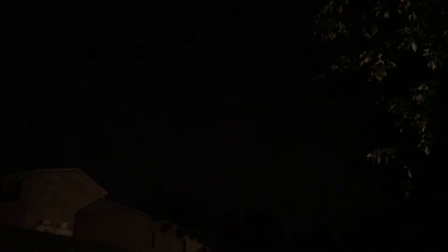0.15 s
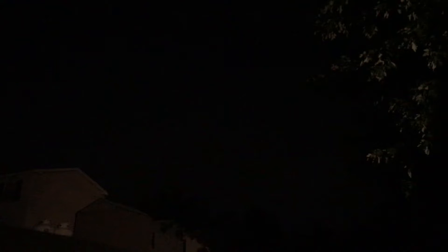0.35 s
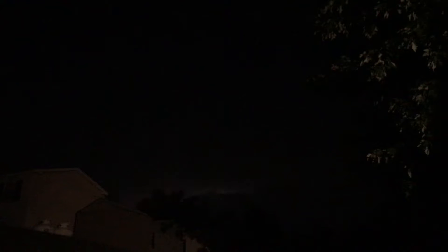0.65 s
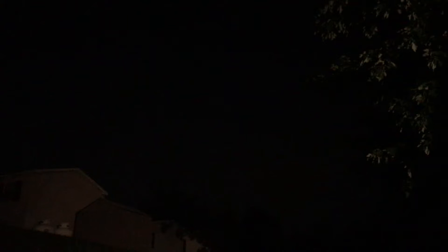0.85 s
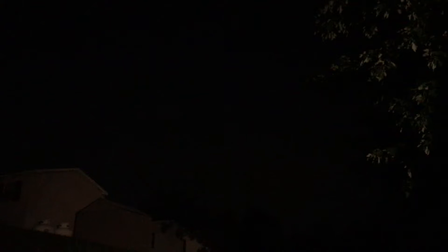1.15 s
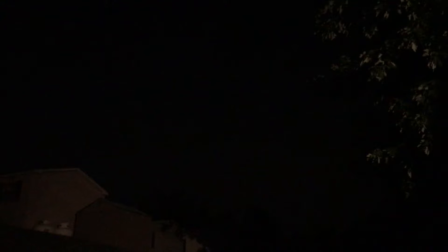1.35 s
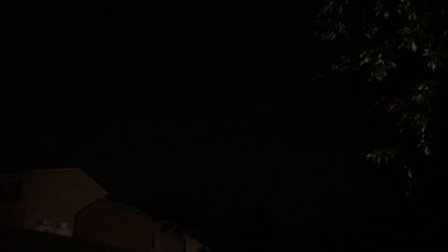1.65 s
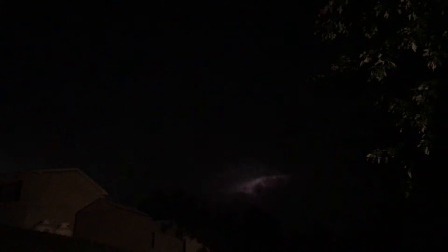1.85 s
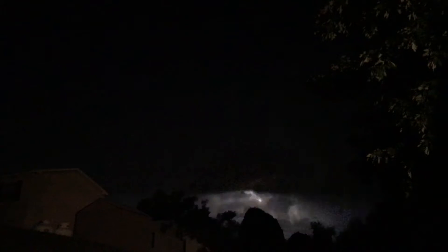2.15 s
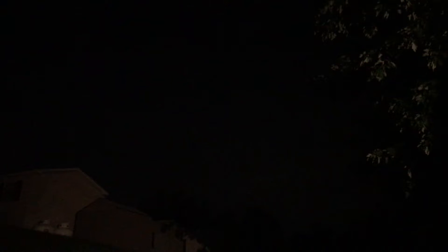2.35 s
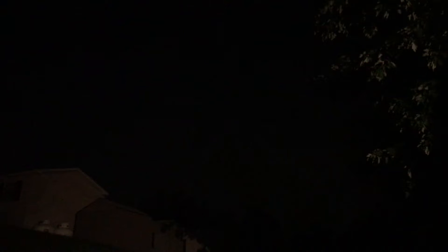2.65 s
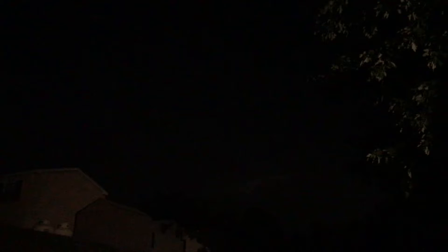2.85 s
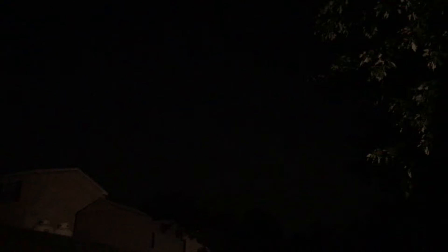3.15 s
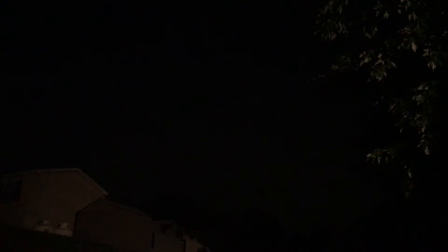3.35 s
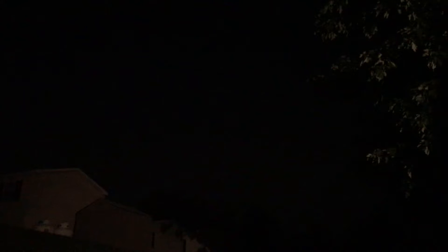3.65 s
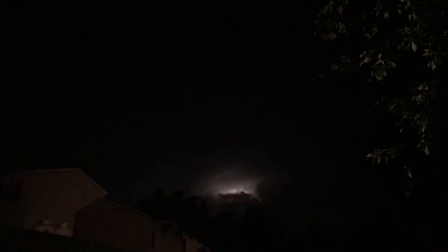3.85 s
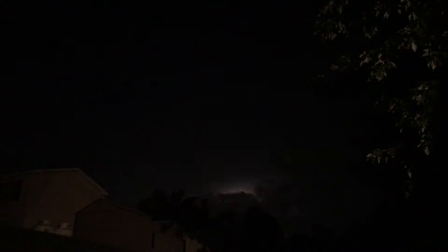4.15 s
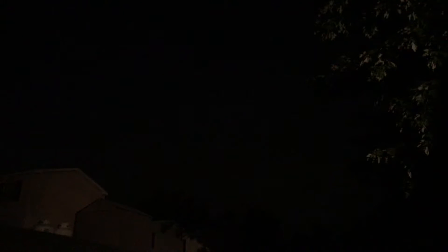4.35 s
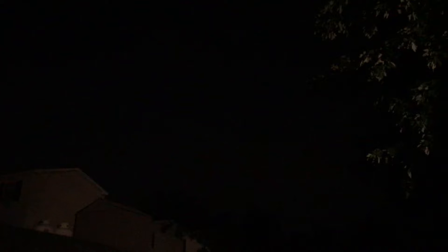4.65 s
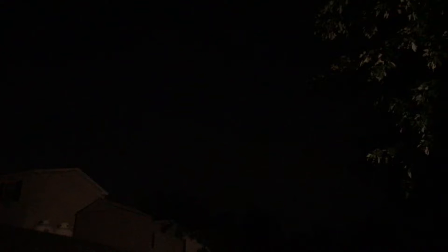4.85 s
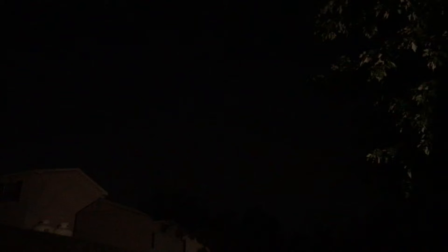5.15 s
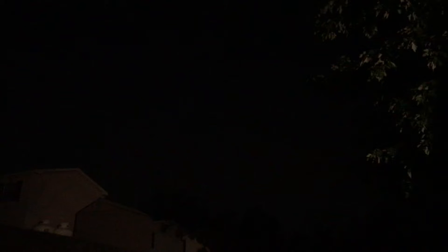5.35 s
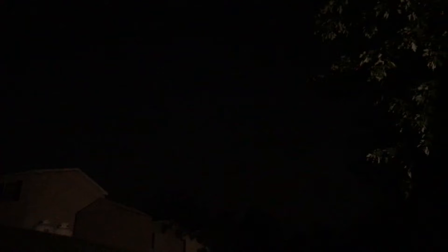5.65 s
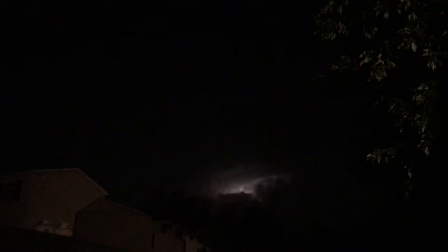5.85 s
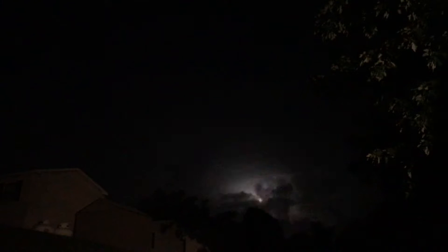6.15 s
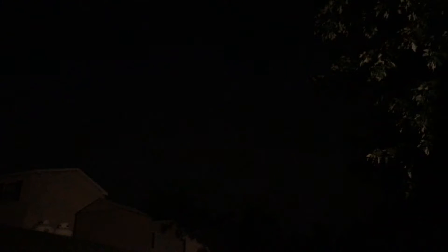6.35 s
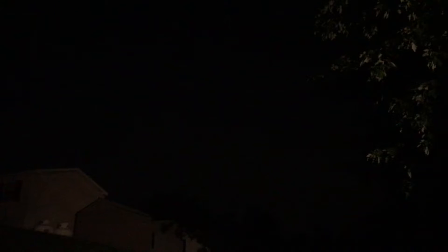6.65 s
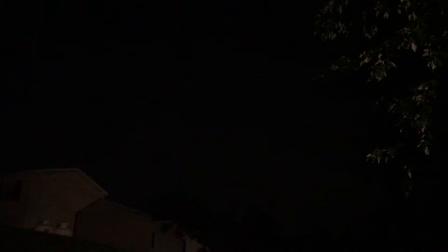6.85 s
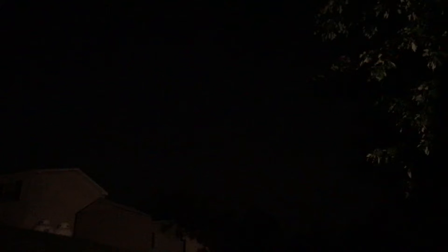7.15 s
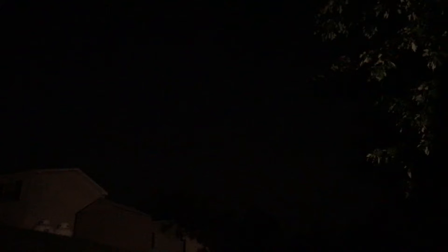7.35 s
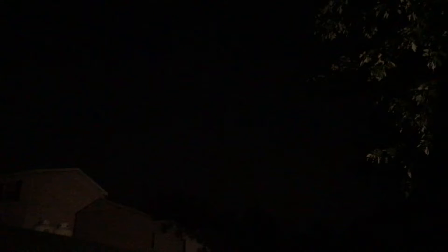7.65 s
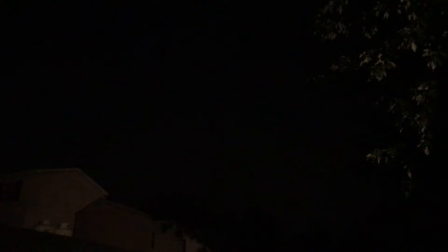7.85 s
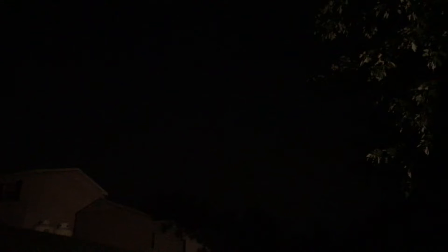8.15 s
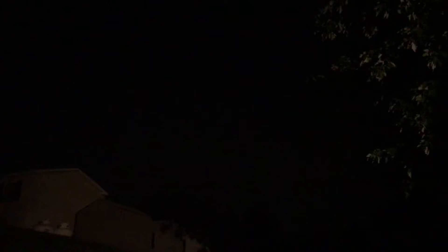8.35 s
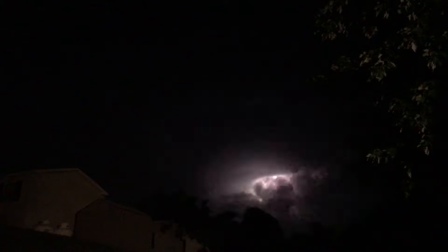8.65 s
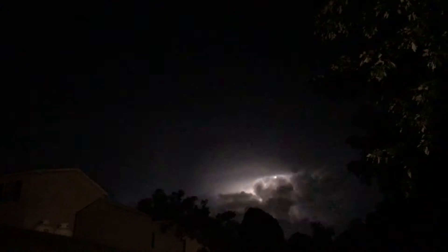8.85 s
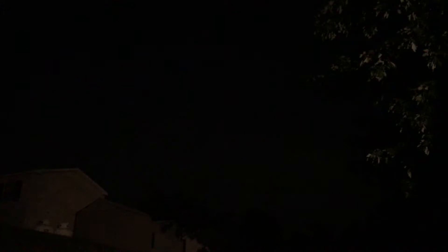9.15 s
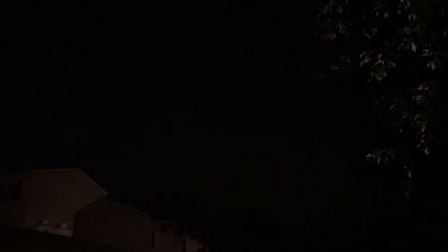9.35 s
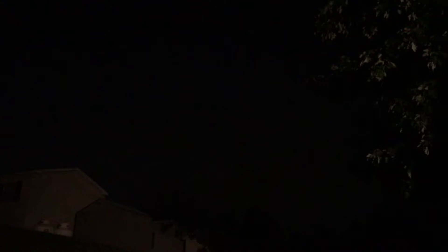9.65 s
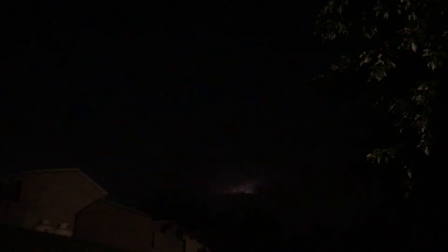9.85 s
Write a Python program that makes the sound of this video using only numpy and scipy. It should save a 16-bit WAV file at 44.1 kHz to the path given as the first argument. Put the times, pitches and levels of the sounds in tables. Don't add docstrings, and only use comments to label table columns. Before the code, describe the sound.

Night crickets throb and trill in a yard, with spaced close chirps, faint katydid rasps and an air cooler humming softly behind.

```python
import sys
import numpy as np
from scipy import signal
from scipy.fft import rfft, irfft
from scipy.io import wavfile
from scipy.ndimage import uniform_filter1d

SR = 44100
rng = np.random.default_rng(int(sys.argv[2]) if len(sys.argv) > 2 else 0)


def invert_db(level):
    return 10 ** (np.asarray(level, dtype=float) / 20)


def log_audio(samples):
    frames = np.atleast_2d(samples).T
    limited = np.clip(frames, -1, 1)
    pcm = np.round(limited * 32767).astype(np.int16)
    wavfile.write(sys.argv[1], SR, pcm)


N = 440559


def evened(x):
    return x / np.sqrt(np.mean(x ** 2) + 1e-20)


def add(mix, start_s, sound):
    part = mix[round(start_s * SR):][:len(sound)]
    part += sound[:len(part)]


def coloured(x, points):
    hz, db = np.transpose(points)
    bin_hz = np.fft.rfftfreq(len(x), 1 / SR)
    gain_db = np.interp(np.log(bin_hz + 1), np.log(hz + 1), db)
    return irfft(rfft(x) * invert_db(gain_db), len(x))


def hump(centre_hz, width_hz):
    bin_hz = np.fft.rfftfreq(N, 1 / SR)
    response = np.exp(-((bin_hz - centre_hz) / width_hz) ** 2)
    return evened(irfft(rfft(rng.standard_normal(N)) * response, N))


def drift(per_s):
    knots = rng.standard_normal(N // 441 + 2)
    slow = signal.lfilter([1], [1, -np.exp(-2 * np.pi * per_s / 100)], knots)
    slow = evened(uniform_filter1d(slow, size=3))
    return np.interp(np.arange(N) / 441, np.arange(len(slow)), slow)


def swells(rows, rest_db):
    t = np.arange(0, N / SR, .005)
    level = np.full(len(t), invert_db(rest_db))
    for peak_s, db, length_s in rows:
        along = np.clip((t - peak_s) / length_s, -.5, .5)
        level += invert_db(db) * np.cos(np.pi * along) ** 2
    return np.interp(np.arange(N) / SR, t, level)


def wing(strokes, hz, fall_hz, duty, blunt, overtone_db, loose_hz, loose_db, slip=1.0):
    whole = strokes.astype(int)
    start, tune, force = rng.standard_normal((whole.max() + 1, 3))[whole].T
    along = np.minimum(strokes % 1 / np.clip(duty, .1, 1), 1)
    pitch_hz = hz + loose_hz * tune + fall_hz * (.5 - along)
    turn = 2 * np.pi * (np.cumsum(pitch_hz) / SR + slip * start + .5 * whole)
    shape = invert_db(loose_db * force) * np.abs(np.sin(np.pi * along)) ** blunt
    return shape * (np.sin(turn) + invert_db(overtone_db) * np.sin(2 * turn))


def scatter(x, t60_s, wet_db):
    t = np.arange(round(.3 * SR)) / SR
    stir = 2 * np.pi * 1.3 * np.arange(N) / SR
    out = x.copy()
    for k in range(3):
        sparse = rng.standard_normal(len(t)) * (rng.random(len(t)) < .05)
        taps = sparse * invert_db(-60 * t / t60_s) * (t > .004)
        taps /= np.linalg.norm(taps)
        share = np.cos(stir + k * np.pi / 3) * np.sqrt(2 / 3)
        out += invert_db(wet_db) * signal.oaconvolve(share * x, taps)[:N]
    return out


# time in s, lead over the even pulse in s, level in dB.
CROWD_PACE = [(0, 0.006, -35.8), (.4, 0.0048, -37), (1.05, .023, -36.5), (1.7, 0.027, -36.5),
              (2.1, 0.021, -36.5), (2.7, 0.037, -36), (3.6, 0.025, -36), (4.3, 0.0091, -36),
              (5.1, 0.0033, -36.5), (5.8, 0.013, -36.5), (6.3, 0.0099, -36), (6.95, .022, -37),
              (7.45, 0.013, -36), (7.9, .018, -36.5), (8.8, 0.011, -36), (9.3, 0.015, -36), (10, .001, -36)]


def crowd(count=18):
    beat_s, first_beat_s = .24005, .045
    low_hz, high_hz = 6834, 7510
    slow_per_s, fast_per_s = 55, 110
    s, ahead_s, db = np.transpose(CROWD_PACE)
    t = np.arange(N) / SR
    beat = (t + np.interp(t, s, ahead_s) - first_beat_s) / beat_s
    high, low = np.zeros(N), np.zeros(N)
    for place in np.arange(count) / (count - 1):
        hz = low_hz + place * (high_hz - low_hz)
        per_s = slow_per_s + rng.random() * (fast_per_s - slow_per_s)
        late = 0.034 * (.5 - place) + 0.089 * drift(0.61)
        chirp = np.cos(np.pi * (beat - late)) ** 2
        song = chirp ** 0.79 * wing(t * per_s, hz + 25 * drift(3.), fall_hz=260, duty=.7, blunt=0.53,
                                    overtone_db=-37, loose_hz=30.04, loose_db=2.3)
        high += song * invert_db(-59.4 * (place - .5) ** 2 + 0.67 * drift(5.4))
    for hz in (6700, 6760, 6820):
        late = .03 + 0.079 * drift(0.61)
        chirp = abs(np.cos(np.pi * (beat - late))) ** 1.7
        low += chirp * wing(t * hz / 80, hz, fall_hz=140, duty=.75, blunt=0.28,
                            overtone_db=-37, loose_hz=30.3, loose_db=2.2)
    both = invert_db(-0.22 * drift(4.2)) * evened(high)
    both += invert_db(-11.5 + 0.5 * drift(1.5)) * evened(low)
    return invert_db(np.interp(t, s, db) - 2.5) * evened(scatter(both, t60_s=0.2, wet_db=-7))


# time in s, strokes per s.
TRILL_PER_S = [(0, 85.7), (1.5, 85.6), (2.5, 85.1), (4, 85.4), (7, 85.3), (8, 85.3), (10, 85.7)]
# time in s, level in dB.
TRILL_LEVEL_DB = [(0, -52.5), (1.5, -52), (3, -52), (4.5, -52), (6, -52), (7.5, -51.5), (9, -52), (10, -51)]
# pitch in Hz, pace as a share of the steady one.
OTHER_TRILLERS = [(5350, .83), (5500, .91), (5650, 1.11), (5780, .72), (5900, 1.21), (6050, .5)]


def trill():
    t = np.arange(N) / SR
    strokes = np.cumsum(np.interp(t, *np.transpose(TRILL_PER_S))) / SR
    steady = wing(strokes + .3, 5800, fall_hz=780, duty=.58, blunt=.7,
                  overtone_db=-30, loose_hz=35, loose_db=1.2)
    others = np.zeros(N)
    for hz, pace in OTHER_TRILLERS:
        song = wing(strokes * pace, hz, fall_hz=450, duty=.6, blunt=1.0,
                    overtone_db=-33, loose_hz=50.1, loose_db=1.8)
        others += invert_db(2.2 * drift(1.7)) * song
    both = scatter(evened(steady) + 1.15 * evened(others), t60_s=.15, wet_db=-4)
    return invert_db(np.interp(t, *np.transpose(TRILL_LEVEL_DB))) * evened(both)


# multiple of the shaft rate, level in dB rms.
SHAFT_LINES = [(1, -62), (4, -59), (6, -66), (12, -75), (13, -67), (16, -69), (18, -71), (19, -75),
               (20, -64), (22, -65), (24, -72), (25, -64), (27, -70)]
# multiple of the shaft rate, level in dB rms.
VALVE_LINES = [(32, -78), (46, -73), (48, -77), (49, -75), (67, -74), (68, -75), (73, -76), (76, -79),
               (78, -75), (79, -77), (81, -71), (83, -78)]
# multiple of the shaft rate, level in dB rms.
FAINT_LINES = [(9, -79), (30, -85), (46, -81), (56, -83), (62, -91), (76, -84), (89, -84)]


def compressor():
    shaft_hz, scatter_db = 58.3517, 2.5
    turn = 2 * np.pi * (shaft_hz * np.arange(N) / SR + .0012 * drift(0.13))
    sway = [invert_db(1.52 * drift(0.93) - 0.1) for k in range(4)]
    every = np.arange(FAINT_LINES[0][0], FAINT_LINES[-1][0] + 1)
    faint_db = np.interp(every, *np.transpose(FAINT_LINES))
    faint_db += scatter_db * rng.standard_normal(len(every))
    levels_db = dict(zip(every, faint_db))
    levels_db.update(SHAFT_LINES)
    levels_db.update(VALVE_LINES)
    out = np.zeros(N)
    for k, db in levels_db.items():
        tone = np.sin(k * turn + 2 * np.pi * rng.random())
        out += np.sqrt(2) * invert_db(db) * sway[int(k) % 4] * tone
    return out


# centre in Hz, width in Hz, level in dB rms.
CASING_HUMPS = [(118.3, 9.4, -54.5), (363, 23.5, -64), (2587, 220, -67.5), (3167, 250, -64.5),
                (3920, 180, -72), (4690, 130, -69)]


def casing_hiss():
    return sum(invert_db(db) * hump(hz, width_hz) for hz, width_hz, db in CASING_HUMPS)


# loudest moment in s, level in dB, length in s.
FAN_SWELLS = [
    (.18, -45, 0.64),
    (3.15, -44.5, 0.46),
    (3.75, -47, .2),
    (5.0, -48, .4),
    (5.6, -45, 0.3),
    (6.95, -52, 0.95),
    (7.9, -47.5, 0.41),
    (8.65, -40, 0.14),
    (9.0, -48, .35),
    (9.67, -44, 0.18),
]
# pitch in Hz, level in dB rms, wander in Hz.
HUM_TONES = [(112.22, -55, .05), (60, -61, .1), (120, -64, .3), (240.1, -65, .02), (512, -62, .8),
             (374.2, -74, .3), (479, -76, .2), (859.05, -78, .05), (1489, -80, .05)]


def fan():
    fan_hz, rest_db = 56.1, -49.5
    out = swells(FAN_SWELLS, rest_db) * np.sin(2 * np.pi * fan_hz * np.arange(N) / SR)
    for hz, db, wander_hz in HUM_TONES:
        cycles = np.cumsum(hz + wander_hz * drift(0.35)) / SR
        out += invert_db(db) * np.sin(2 * np.pi * (cycles + rng.random()))
    return np.sqrt(2) * out


# frequency in Hz, level in dB per Hz.
AIR_SPECTRUM = [(25, -27), (40, -9.5), (58, 2.5), (95, -3.5), (160, -1), (300, -10.5), (460, -16.5),
                (750, -21), (1250, -19.5), (1750, -24.5), (3550, -31), (4400, -29), (6300, -25),
                (8000, -56)]


def air():
    wash = evened(coloured(rng.standard_normal(N), AIR_SPECTRUM))
    return invert_db(-44 + 1.02 * drift(0.89)) * wash


# loudest moment in s, level in dB, length in s.
FAR_KATYDIDS = [(.15, -68, 0.39), (.6, -65.5, 0.75), (1.2, -69, 1), (1.85, -67, 0.76), (2.45, -69, 0.59),
                (2.86, -72, .15), (3.6, -67, 0.41), (3.87, -71, .12), (4.04, -67, .15), (4.16, -68, 0.092),
                (4.55, -77, 0.53), (5.2, -67.5, 1), (6.35, -69.5, 0.74), (6.9, -72, 0.66),
                (7.4, -67.5, 1.0), (7.92, -71, .15), (8.4, -64.5, 0.92), (8.83, -62.5, .4), (9.1, -72, .2),
                (9.45, -67, 0.5), (9.95, -71, 0.2)]
# start in s, level in dB, length in s.
NEAR_SCRAPES = [(3.044, -56, .04), (3.09, -56, 0.055), (3.135, -52, 0.05), (3.18, -51, 0.055),
                (3.236, -51.5, 0.061), (3.29, -60, .04), (3.322, -56, 0.048), (3.367, -63, 0.035),
                (4.223, -55, 0.038), (4.276, -54, 0.035), (4.327, -54, 0.04), (4.38, -56, .045),
                (4.43, -67, 0.046), (4.466, -63, 0.03)]
# start in s, length in s, level in dB.
THIN_CALLS = [
    (5.0, 0.28, -72),
    (1.72, 0.27, -74),
    (5.9, .15, -82),
]
# frequency in Hz, level in dB per Hz.
RASP_SPECTRUM = [(5500, -17), (7800, 0.5), (9000, -3), (10300, -13.5), (12000, -13.5), (13000, -26),
                 (14500, -33)]


def katydids():
    effort = swells(FAR_KATYDIDS, rest_db=-73) * invert_db(2.6 * drift(14.))
    for s, db, length_s in NEAR_SCRAPES:
        add(effort, s - .008, invert_db(db) * np.hanning(round(1.2 * length_s * SR)))
    thin = np.zeros(N)
    for s, length_s, db in THIN_CALLS:
        add(thin, s, invert_db(db) * signal.windows.tukey(round(length_s * SR), .7))
    teeth = rng.standard_normal(N) * (rng.random(N) < .6)
    rasp = effort * evened(coloured(teeth, RASP_SPECTRUM))
    rasp += thin * invert_db(2 * drift(15.)) * hump(centre_hz=11600, width_hz=1000)
    return scatter(rasp, t60_s=0.1, wet_db=0.31)


# first stroke in s, stroke count, stroke gap in s.
NEAR_CHIRPS = [
    (.0125, 11, .01523),
    (1.8315, 12, .01515),
    (3.995, 11, .01525),
    (5.450, 11, .01528),
    (6.9335, 12, .0153),
    (8.6925, 11, .01508),
]
# level in dB, first stroke in dB.
CHIRP_EFFORT = [
    (-32.5, -3),
    (-32.5, -2.5),
    (-32, -8),
    (-32.5, -6),
    (-32.5, -6),
    (-32.5, -7.5),
]


def chirper():
    arch_hz, sink_hz, warm_hz_per_db = 38, 190, 35
    out = np.zeros(N)
    for (s, count, gap_s), (db, first_db) in zip(NEAR_CHIRPS, CHIRP_EFFORT):
        strokes = np.arange(round(count * gap_s * SR)) / SR / gap_s
        whole = strokes.astype(int)
        hz = 5822 + arch_hz * np.sin(np.pi * (whole / count) ** 1.5)
        hz += warm_hz_per_db * first_db * np.exp(-whole / .5)
        song = wing(strokes, hz, fall_hz=sink_hz * whole / count - 30, duty=.68, blunt=.7,
                    overtone_db=-39, loose_hz=14, loose_db=1.0, slip=.25)
        level_db = db - .5 + 1.1 * first_db * (whole == 0)
        add(out, s + 0.00113, invert_db(level_db) * song)
    wall_s = .0135
    add(out, wall_s, invert_db(-15) * out[:-round(wall_s * SR)].copy())
    return scatter(out, t60_s=.25, wet_db=-13.5)


def scene():
    insects = crowd() + trill() + katydids() + chirper()
    machines = compressor() + casing_hiss() + fan()
    mono = insects + machines + air()
    return np.array([mono, mono])


# frequency in Hz, level in dB per Hz.
HISS_SPECTRUM = [(5000, 0), (8000, 12), (10500, -10), (12800, 9), (15700, 9)]


def microphone_hiss():
    return invert_db(-72.5) * evened(coloured(rng.standard_normal(N), HISS_SPECTRUM))


def top_cut(x):
    return signal.sosfilt(signal.butter(12, 16330, fs=SR, output="sos"), x)


def record(dry):
    band_limit = signal.firwin(3001, 15730, window=("kaiser", 9), fs=SR)
    mix = signal.oaconvolve(dry + microphone_hiss(), band_limit[None], "same")
    return top_cut(mix)


dry = scene()
out = record(dry)
log_audio(out)
```